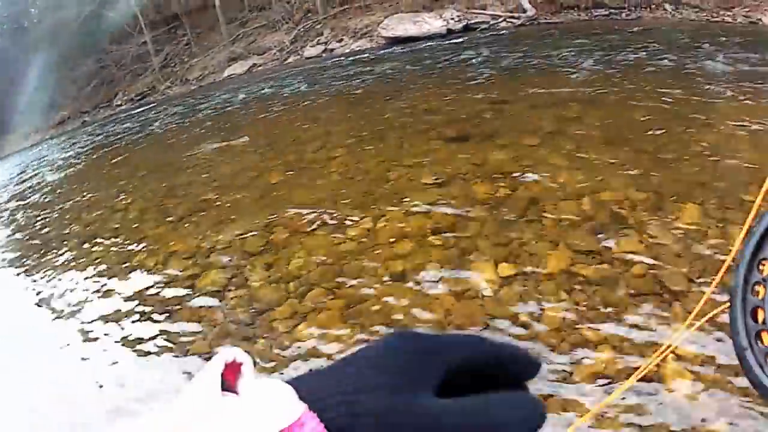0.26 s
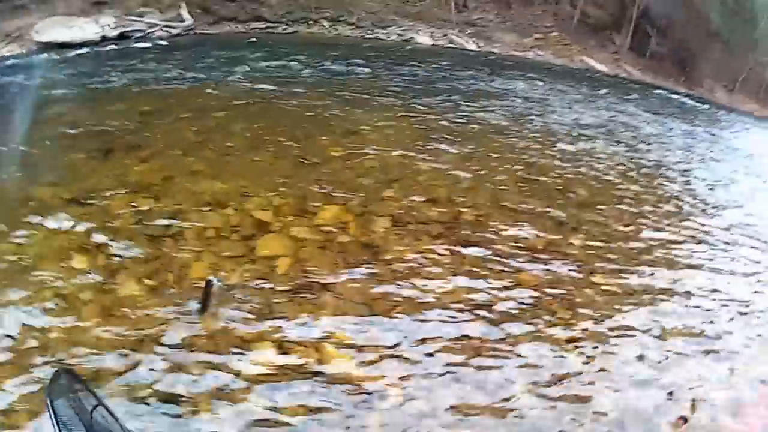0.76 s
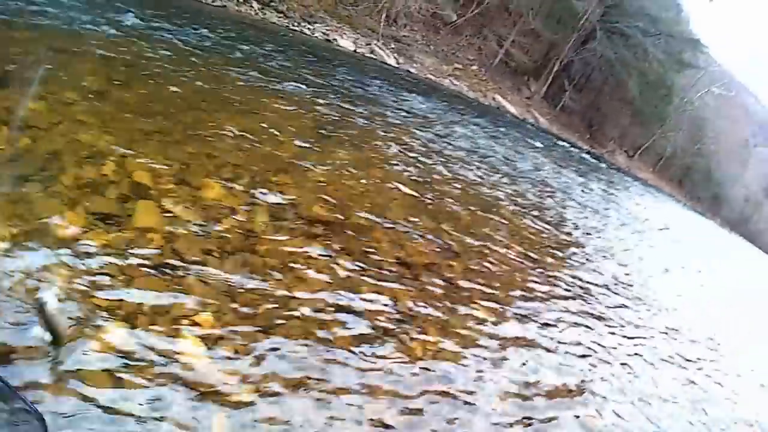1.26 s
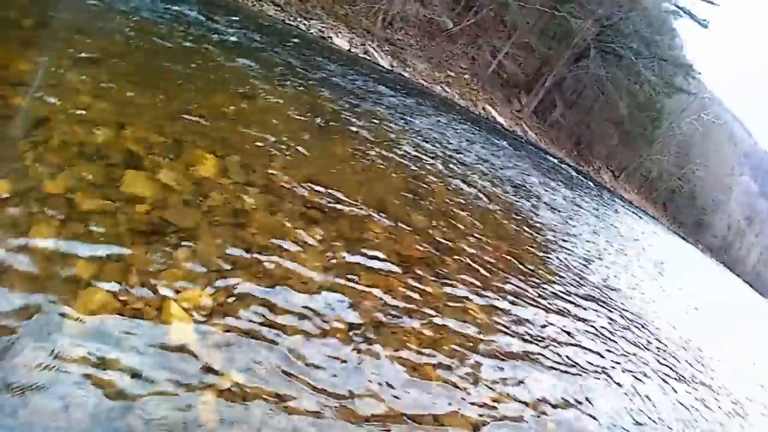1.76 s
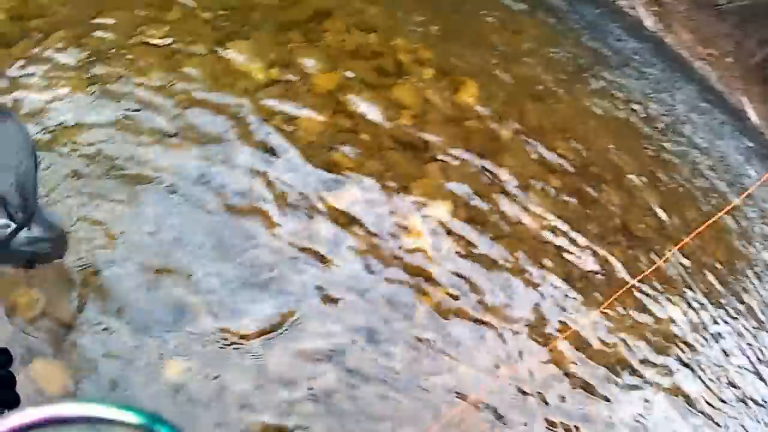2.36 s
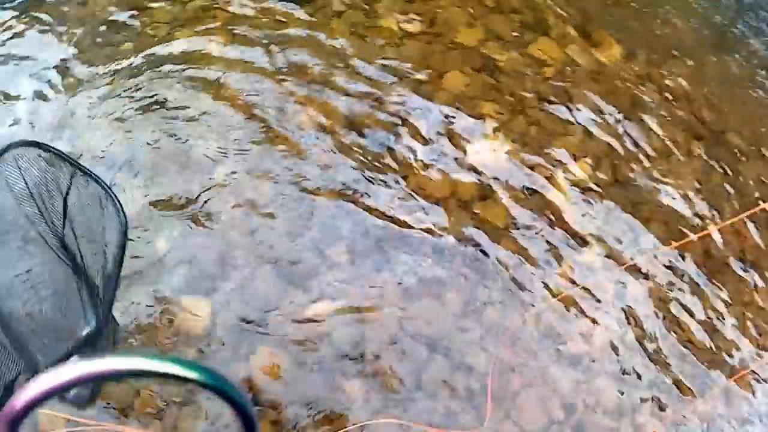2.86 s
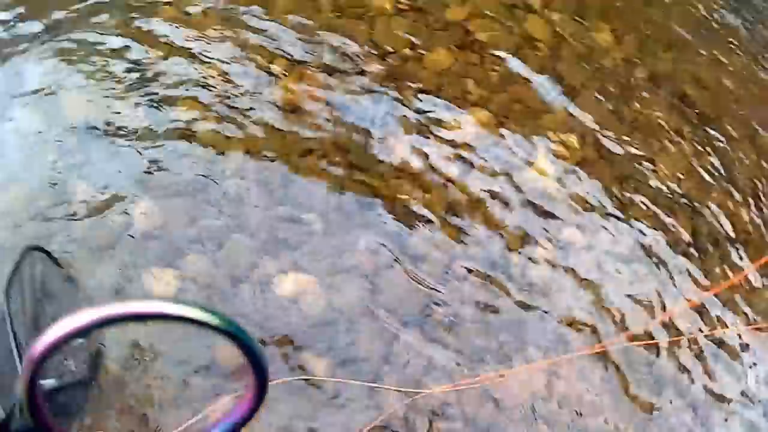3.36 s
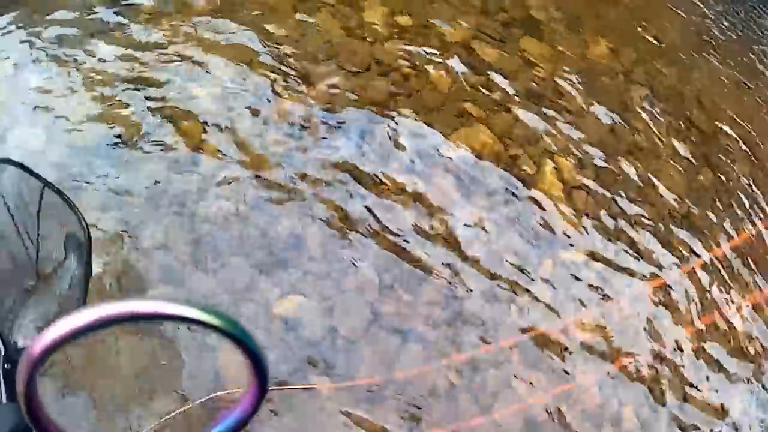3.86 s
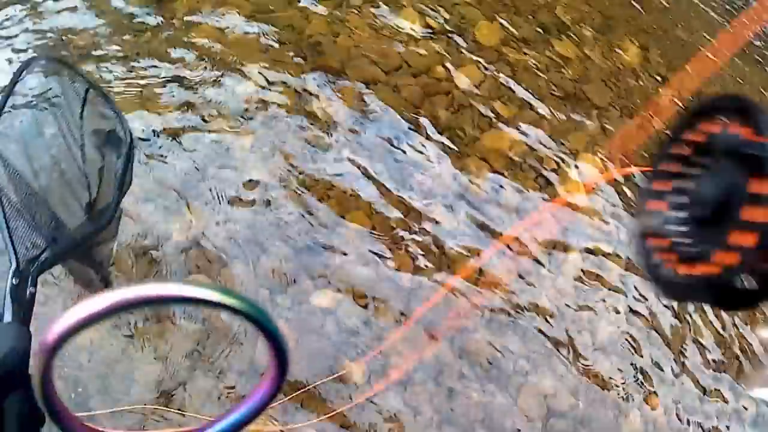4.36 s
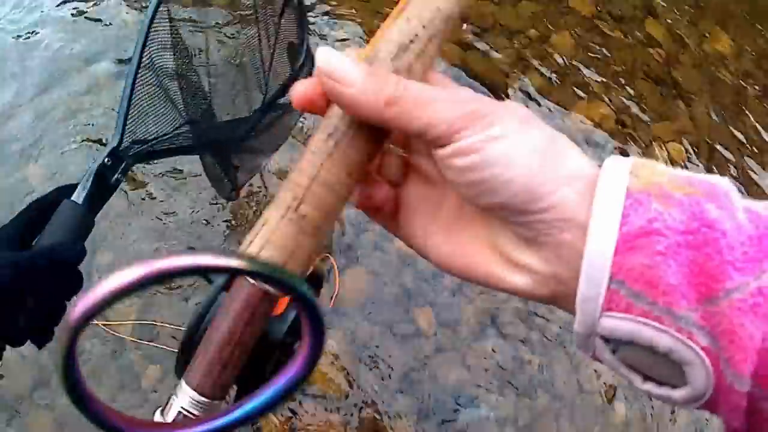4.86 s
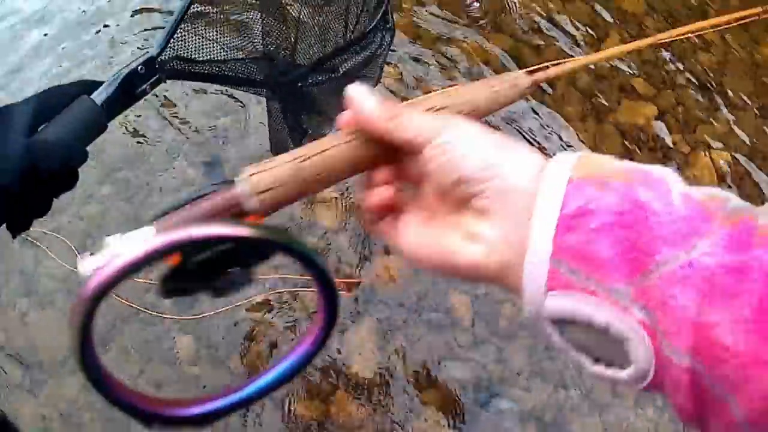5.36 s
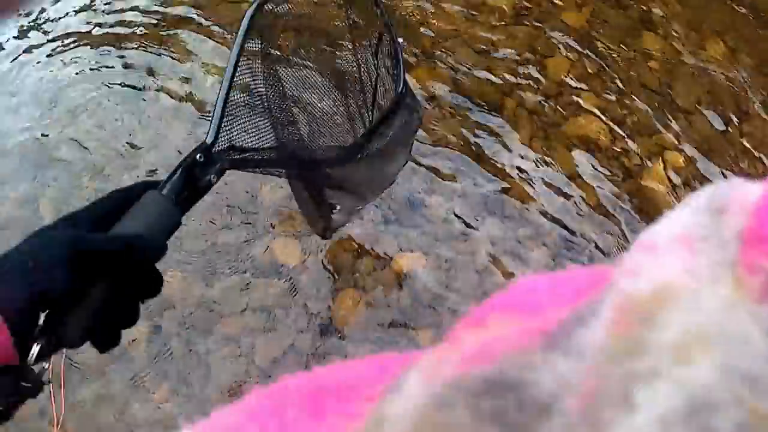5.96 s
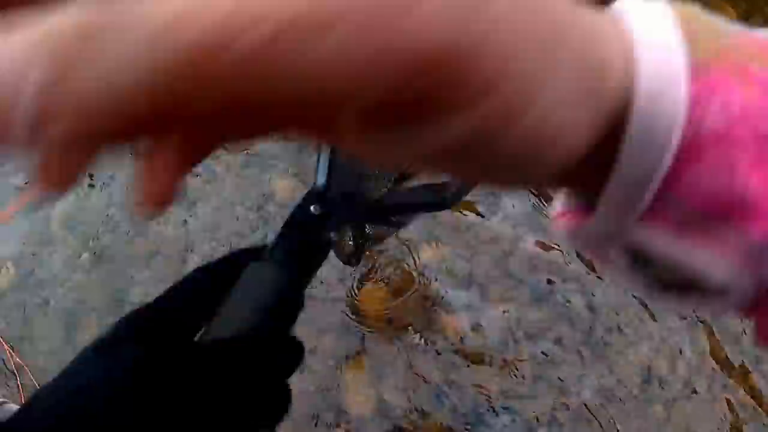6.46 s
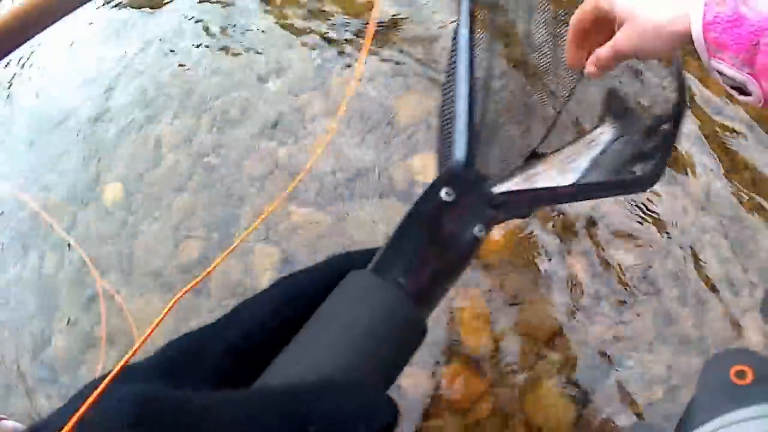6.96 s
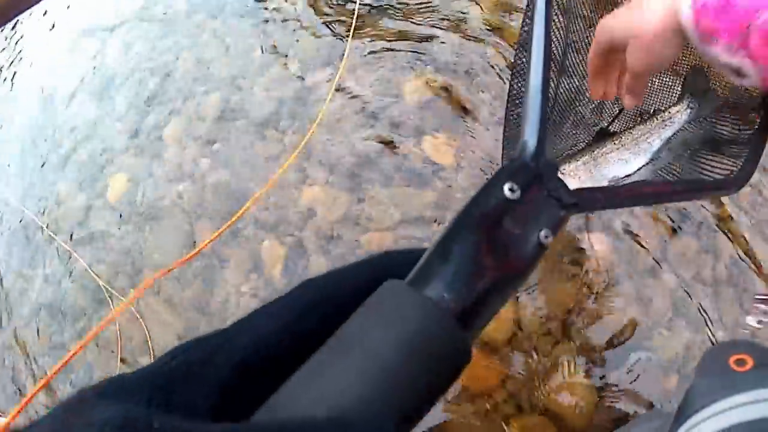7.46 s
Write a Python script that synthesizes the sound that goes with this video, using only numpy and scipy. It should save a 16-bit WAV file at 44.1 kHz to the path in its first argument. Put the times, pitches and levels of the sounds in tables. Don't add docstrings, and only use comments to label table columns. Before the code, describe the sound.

A cheap, muffled, low-bandwidth microphone sealed in a case on an angler's chest picks up mostly contact noise, with a shallow stream only a faint dull murmur. Near silence opens, with tiny taps around 0.4-0.6 s. From 0.7 to 1.25 s fleece sweeps across, with a firm push, strap taps and a low bump. Between 1.9 and 4.5 s there are sparse soft brushes and small hollow ticks between quiet rests. Clicks and knocks return at 4.6-5.3 s; rubbing and swaying thicken from 5.4, with a sharp knock at 5.72. A rattling cluster of strikes and scrapes hits at 6.12, then hard hollow blows from 6.4, peaking at 6.54 with a short boom. Scuffs and taps continue to 6.8. After a lull, quick ticks lead to a bright hard clack at 7.09, smaller taps at 7.16 and 7.25, then faint murmur.

```python
import sys
import numpy as np
from scipy import signal
from scipy.fft import rfft, irfft, next_fast_len
from scipy.io import wavfile
from scipy.ndimage import uniform_filter1d, map_coordinates

SR = 44100
rng = np.random.default_rng(int(sys.argv[2]) if len(sys.argv) > 2 else 0)


def amplitude_ratio(level_db):
    exponent = np.asarray(level_db, float) / 20
    return 10 ** exponent


def store_wav(level_fs):
    pcm = np.round(np.clip(np.atleast_2d(level_fs), -1, 1) * 32767)
    wavfile.write(sys.argv[1], SR, pcm.T.astype(np.int16))


N = 339570

# (frequency [Hz], level [dB per Hz])
CASE_SPECTRUM = [(180, -39.5), (300, -11), (331, -17.5), (520, -12), (901, -10.5), (1130, -1), (1250, -12),
                 (1530, -2), (1820, -4.5), (2250, -12), (2750, -27), (3150, -14.5), (3500, -17),
                 (3950, -57), (5140, -73.5), (8690, -120)]
# (frequency [Hz], level [dB per Hz])
SWAY_SPECTRUM = [(7.1, -41), (12, 3.5), (31, -0.5), (206, -20), (300, -27), (390, -53), (660, -120)]
# (frequency [Hz], level [dB per Hz])
DRAG_SPECTRUM = [(60, -14), (150, -1.5), (350, -4.5), (600, -8.5), (900, -11.5), (2000, -19.5)]
# (frequency [Hz], level [dB per Hz])
STREAM_SPECTRUM = [(59, -29), (100, 0.5), (161, -3), (203, -5), (273, -18), (304, -1), (365, -13),
                   (1510, -17), (3530, -24.5), (3990, -29), (5190, -44), (8780, -120)]
# (frequency [Hz], step [dB])
CAMERA_STEP = [(100, -28), (800, -22), (1600, -18), (2300, -9), (3200, -4.5), (3700, -3), (4000, .5)]

# (start [s], length [s], level [dB], fibre pitch [Hz])
RESTS = [
    (0, 0.031, -74, 1430),
    (0.555, 0.92, -71, 1400),
    (1.563, 0.33, -72, 1400),
    (2.706, 0.25, -70, 1510),
    (3.408, 0.67, -74.5, 1500),
    (4.216, 0.53, -72.5, 1558),
    (4.803, 0.43, -73.5, 1430),
    (6.958, 0.34, -70.5, 1400),
    (7.263, 0.11, -74.5, 1400),
    (7.398, 0.36, -80.5, 1367),
]
# (start [s], length [s], level [dB], fibre pitch [Hz])
STROKES = [(0.739, 0.29, -62.5, 1330), (0.925, 0.076, -53.5, 1486), (1.096, 0.11, -55, 1490),
           (2.055, 0.36, -66, 1400), (2.42, 0.16, -70.5, 1400), (2.37, .12, -67, 1450),
           (.66, .04, -67, 1500), (1.41, .04, -71, 1400), (5.95, .04, -53, 1520), (2.531, 0.037, -64, 1190),
           (2.573, 0.026, -63, 1670), (2.744, 0.025, -65, 1370), (2.791, 0.041, -66, 1620),
           (3.024, 0.028, -68, 1830), (3.149, 0.017, -58.5, 1630), (3.248, 0.082, -64.5, 1560),
           (3.594, 0.13, -74.5, 1470), (4.592, 0.15, -64.5, 1550), (4.99, 0.049, -69.5, 1430),
           (5.307, 0.055, -68, 1540), (5.597, 0.21, -59.5, 1640), (5.961, 0.31, -49, 1476),
           (6.138, 0.031, -43.5, 1355), (6.285, 0.18, -54, 1400), (6.433, 0.094, -42.5, 1290),
           (6.513, 0.14, -49, 1315), (6.599, 0.032, -47, 1546), (6.731, 0.043, -57.5, 1490),
           (6.85, 0.076, -65, 1380), (7.105, 0.052, -57, 1508)]
# (start [s], length [s], level [dB], fibre pitch [Hz])
GRABS = [
    (.425, 0.08, -68, 1440),
    (1.96, 0.037, -72, 1352),
    (5.431, 0.65, -57, 1596),
]
# (time [s], width [s], reduction [dB])
LIFTS = [(.82, .07, 4), (1.29, .09, 4), (2.655, .07, 8), (3.22, .05, 5), (3.37, .04, 6), (3.625, .05, 7),
         (4.42, .05, 3), (6.415, .018, 7), (6.82, .05, 4), (7.13, .035, 8), (7.195, .02, 7)]
# (start [s], length [s], level [dB])
LEANS = [(.7, 0.13, -63.5), (.96, 0.033, -58), (1.14, 0.075, -50.5), (1.52, 0.26, -66), (2.12, 0.34, -67.5),
         (2.5, 0.99, -63), (3.19, 0.092, -54.5), (3.6, 0.43, -65), (4.4, 0.33, -61), (4.7, 0.27, -57),
         (5, 0.27, -70), (5.47, 0.082, -50), (5.62, 0.36, -53), (6.11, 0.15, -45.5), (6.56, 0.029, -47),
         (6.65, 0.15, -53), (6.88, 0.44, -58)]

# (time [s], peak [dB], frequency [Hz], length [ms])
WALL_RINGS = [(.4235, -64.5, 3300, 1.5), (3.547, -61, 1970, 6), (3.807, -58.5, 3400, 1.5),
              (3.844, -61, 3500, 1.5), (3.975, -51, 1300, 5), (4.328, -54, 1490, 5),
              (4.466, -56, 3540, 1.5), (4.617, -57, 3480, 1.5), (5.01, -45.5, 1600, 7),
              (6.5372, -15.5, 3640, 2), (7.0872, -21.5, 3520, 2.5), (.998, -46, 1490, 9.2),
              (1.21, -43.5, 1620, 10), (2.015, -53, 1400, 14), (3.657, -51.5, 1416, 8.6),
              (4.617, -39, 1590, 6.2), (5.278, -40.5, 1680, 5.8), (6.091, -35, 1700, 10),
              (6.106, -36, 1650, 5.4), (6.165, -34, 1690, 6.4), (6.176, -33.5, 1470, 6),
              (6.503, -27.5, 2050, 3.7), (6.1198, -29, 1940, 3.5), (6.123, -29, 3000, 7.3),
              (6.1237, -23, 1260, 6.5), (6.13, -19.5, 1200, 2.9), (6.1337, -18.5, 1220, 4.6),
              (6.4974, -17.5, 1560, 5.8), (6.5372, -8.5, 1192, 4.5), (6.538, -19, 2970, 6.2),
              (6.54, -15.5, 1576, 5.9), (6.601, -31.5, 1500, 11), (6.631, -34, 1500, 10),
              (6.643, -34, 1495, 11), (6.658, -38, 1550, 9), (6.695, -30, 1350, 5.1), (6.7, -31, 1660, 7),
              (6.7525, -36.5, 1573, 6.6), (7.055, -33.5, 1240, 4.5), (7.067, -33.5, 1300, 4.4),
              (7.075, -28.5, 1290, 5.2), (7.0797, -28, 1250, 4.2), (7.087, -11.5, 1430, 4.8),
              (7.0873, -16, 1910, 4.3), (7.0873, -27.5, 2900, 4.6), (7.163, -33, 1500, 4.7),
              (7.167, -32.5, 1430, 6)]
# (time [s], peak [dB], frequency [Hz], length [ms])
FURTHER_RINGS = [(6.4975, -36, 3200, 5), (6.484, -46, 3250, 6), (3.0385, -54, 3200, 4), (5.718, -40, 3200, 4.5),
                 (5.731, -47, 3200, 4), (6.158, -44, 3000, 8), (7.034, -60, 3100, 24), (7.078, -42, 2800, 4),
                 (7.162, -44, 2800, 4), (7.167, -37, 1800, 7), (7.0868, -23, 3800, 3), (5.709, -38, 1600, 6),
                 (3.395, -56, 2000, 9), (3.657, -58, 2000, 9), (5.848, -49, 1950, 8), (5.857, -48, 2000, 7),
                 (5.888, -48, 1600, 8), (5.903, -47, 1550, 7), (5.942, -44, 1550, 8), (5.954, -43, 1500, 8),
                 (5.97, -43, 1550, 8), (6.325, -50, 3200, 24), (6.35, -49, 3250, 24), (6.372, -50, 3200, 24),
                 (5.635, -46, 1650, 8), (5.647, -45, 1800, 8), (5.655, -46, 1600, 8), (6.538, -27, 620, 10),
                 (6.684, -37, 1250, 8), (6.708, -36, 1700, 8), (6.59, -34, 1500, 7), (7.231, -50, 1300, 10),
                 (7.215, -62, 3000, 24), (6.785, -56, 3200, 16), (6.508, -30, 1550, 7), (6.617, -34, 1550, 7)]
# (time [s], peak [dB], ring [Hz])
SLEEVE_KNOCKS = [(.426, -56, 1450), (.526, -53, 1540), (0.549, -56, 1500), (0.73, -48, 1600),
                 (0.907, -48, 1220), (2.332, -46, 1180), (3.076, -53, 1870), (3.154, -45, 1690),
                 (3.408, -56.5, 1310), (3.602, -49.5, 1470), (4.329, -51, 1530), (4.465, -45.5, 1590),
                 (4.552, -55, 1450), (5.244, -48.5, 1500), (5.438, -42.5, 1430), (5.519, -49, 1600)]
# (time [s], peak [dB], ring [Hz], contact [ms])
STRAP_TAPS = [(.757, -45, 1220, 4.4), (1.047, -45, 1690, 2.8), (1.117, -41, 1440, 7),
              (1.175, -32, 1400, 12), (1.2, -38, 1510, 5.2), (3.809, -56, 1580, 3), (1.873, -50, 1140, 9.6),
              (2.011, -48, 1290, 4.2), (2.824, -46, 1880, 10), (3.04, -46, 1810, 6), (3.333, -45, 1520, 11),
              (3.547, -59, 1980, 4.4), (5.008, -39.5, 1510, 3.8), (5.317, -43.5, 1530, 1.8),
              (5.364, -46, 1540, 2.3), (5.611, -41.5, 1600, 3.1), (5.733, -38, 1460, 4),
              (5.841, -44, 1760, 6.8), (6.753, -38, 1650, 4.2), (6.771, -37.5, 1700, 6),
              (7.04, -45, 1400, 7), (7.056, -39, 1230, 11), (7.248, -39, 1430, 8)]
# (time [s], peak [dB], ring [Hz], body [dB], snap [dB])
GEAR_BLOWS = [(6.398, -31, 1090, 1, -20), (.622, -51, 1400, 0, -25), (3.399, -56, 1880, -7, -14),
              (3.965, -43.5, 1460, -9, -5), (4.618, -41, 1600, -38, -20), (4.653, -41, 1910, -10, -2.5),
              (5.279, -43.5, 1650, -44, -43), (5.541, -38.5, 1460, 3, -3), (5.709, -40, 1600, -16, -15),
              (5.718, -22, 1640, -12.5, -7), (6.122, -24, 1530, -26, -2), (6.4258, -30, 1250, -6, -8),
              (6.4437, -33, 1258, -8, -20), (6.47, -35, 1164, -3, -25), (6.503, -23, 1520, -26, -28),
              (6.507, -27, 1650, -14, -19.5), (6.5376, -15, 1320, -9.5, -2.5), (6.908, -46, 1590, -19, 1.5),
              (7.069, -33, 1896, -26, -15.5), (7.075, -26.5, 1400, -35, -21.5),
              (7.082, -32, 1144, -38, -3.5), (7.0872, -18.5, 1470, -49, 4.5), (7.162, -32, 1827, -30.5, 0),
              (7.229, -43, 1750, -28, -6.5)]
# (time [s], peak [dB], ring [Hz], snap [dB], contact [ms])
SCRAPES = [(6.539, -20.5, 1900, -21.5, 6), (7.088, -25, 1917, -6, 3.7), (.996, -42.5, 1520, -48, 6.1),
           (3.281, -46, 1470, -31, 42), (6.035, -36.5, 1690, -22, 6.4), (6.1205, -20, 1670, -3, 15.6),
           (6.131, -21, 1500, -7.5, 6.4), (6.592, -28.5, 1800, -5, 33), (7.06, -34.5, 1326, -10, 34),
           (7.146, -46, 1770, -5, 14), (7.16, -28, 1700, -7, 11.5), (6.4905, -29, 1510, -18, 8.9),
           (6.5295, -21, 1353, -13.5, 6.3)]
# (time [s], peak [dB], ring [Hz], snap [dB], contact [ms])
SHOVES = [
    (.944, -33, 1450, -24.5, 14),
    (3.659, -49, 1470, -40, 9.8),
    (4.723, -52, 1550, -27, 12),
    (5.939, -64, 1680, -12, 14),
    (6.175, -32.5, 1470, -48, 17),
    (6.635, -37, 1502, -26, 13),
    (6.7, -29.5, 1750, -9.5, 11),
    (6.694, -31, 1500, -14.5, 13),
]
# (time [s], level [dB], frequency [Hz], t60 [ms], overtone [dB])
WALL_STRIKES = [(6.4256, -17.5, 1200, 25, -17), (6.4436, -21.5, 1200, 25, -22),
                (6.4705, -24.5, 1170, 20, -24), (3.0388, -43, 1900, 14, -14), (5.7312, -36, 1800, 10, -9),
                (6.1206, -26, 1450, 16, -4), (6.1317, -22, 1300, 12, -8), (7.0805, -30, 1350, 12, -8),
                (7.0415, -45, 1350, 20, -14), (.6225, -48, 1300, 12, -20), (6.597, -40, 1900, 10, -6),
                (6.6955, -34, 1300, 14, -10), (6.7059, -36, 1800, 10, -6), (5.8412, -47, 2050, 16, -24),
                (3.409, -62, 1400, 6, 2), (3.582, -59, 2000, 16, -20), (3.602, -55, 1500, 16, -12),
                (1.0485, -45, 1500, 12, -18), (5.4385, -43, 1550, 20, -14), (5.448, -46, 1550, 16, -16),
                (5.5195, -46, 1600, 16, -20), (.4265, -58, 1500, 16, -8)]
# (time [s], peak [dB], width [ms], direction [signed gain])
JOLTS = [(.98, -34, 6.8, 0.83), (1.152, -35, 5.7, 1), (1.19, -34.5, 6.2, 0.9), (1.224, -35, 8, -0.81),
         (4.642, -40, 7.3, -1.1), (4.703, -36, 15, 1), (4.719, -41, 11, -1.1), (5.478, -26, 18, 0.64),
         (5.495, -28, 28, -1.15), (5.519, -29, 6.3, 1), (6.008, -32.5, 77, -0.59), (6.173, -36, 18, -1.2),
         (6.212, -29.5, 32, -0.5), (6.535, -19.5, 3.7, 0.36), (6.547, -11.5, 11, -0.36),
         (6.589, -23.5, 7.8, 0.91), (6.64, -39, 72, -1.1), (6.71, -23, 6.5, 0.97),
         (6.727, -34.5, 32, -1.25)]
# (time [s], level [dB], frequency [Hz], t60 [s])
THUDS = [
    (.546, -49.5, 250, 0.046),
    (2.1, -54, 440, .03),
    (4.326, -52, 290, 0.022),
    (4.551, -44.5, 340, 0.027),
    (6.526, -22, 110, 0.033),
    (6.537, -15, 147, 0.05),
    (6.425, -28, 160, .03),
    (6.492, -27, 210, 0.045),
    (1.196, -26.5, 110, 0.032),
]
# (time [s], step [dB])
SLIPS = [
    (5.543, -36),
    (5.5767, -31),
    (6.75, -31),
]

STROKE_RISE_DB_S, STROKE_FALL_DB_S, GRAB_RISE_DB_S = 202, 107.5, 2000
STILL_DB, STILL_HZ = -82, 1400
LEAN_RISE_DB_S, LEAN_FALL_DB_S, STAND_DB = 84.5, 80, -66.5
DRAG_BY_LEAN, DRAG_BY_RUB, DRAG_DB = 0.46, 0.41, -10
HOLLOW_HZ, HOLLOW_WIDTH_HZ, HOLLOW_SHARE = 584, 130, 0.11
PADDED_BODY_DB, PADDED_SNAP_DB, PADDED_MS = -7, -17.5, 7.2
TAP_BODY_DB, TAP_SNAP_DB, BLOW_MS = -17.5, -31, 6.2
SCRAPE_BODY_DB, SHOVE_BODY_DB = -21, -7
RING_LEAN, KNOCK_RISE_MS, HARD_ABOVE_DB = .75, .4, -24
DENT_SHARE, DENT_MS = 1.6, .45
INSIDE_HZ, INSIDE_DB, INSIDE_BY_DULL = 610, -22, .6
CAMERA_HZ, HOP, START = 8000, 128, 280
SPARE_ABOVE_DB, SPARE_SHARE = -38.5, 0.51


def unit(x):
    return x / np.sqrt(np.mean(x ** 2) + 1e-20)


def along(points, hz):
    f, v = np.transpose(points)
    return np.interp(np.log(hz + 1), np.log(f + 1), v)


def wobble(rate_hz):
    return map_coordinates(rng.standard_normal(int(N * rate_hz / SR) + 4), [np.arange(N) * rate_hz / SR])


def coloured(x, spectrum):
    m = next_fast_len(N + 8192)
    gain = amplitude_ratio(along(spectrum, np.fft.rfftfreq(m, 1 / SR)))
    return unit(irfft(rfft(x, m) * gain, m)[:N])


def ring(x, hz, width_hz):
    return signal.lfilter(*signal.iirpeak(hz, hz / width_hz, SR), x)


def add_at(out, s, sound):
    out[round(s * SR):][:len(sound)] += sound


def bell(t, centre_s, width_s):
    return np.exp(-np.log(16) * ((t - centre_s) / width_s) ** 2)


def curves(rows, rise_db_s, fall_db_s):
    s, long_s, db = np.transpose(rows)[:3, :, None]
    t = np.arange(0, N, 32) / SR
    below_db = np.clip(s - t, 0, None) * rise_db_s + np.clip(t - s - long_s, 0, None) * fall_db_s
    return amplitude_ratio(2 * (db - below_db))


def fine(v):
    return np.interp(np.arange(N), 32 * np.arange(len(v)), v)


def gestures():
    swept = RESTS + STROKES
    rubs = np.vstack([curves(swept, STROKE_RISE_DB_S, STROKE_FALL_DB_S),
                      curves(GRABS, GRAB_RISE_DB_S, STROKE_FALL_DB_S)])
    still = amplitude_ratio(2 * STILL_DB)
    total = rubs.sum(axis=0) + still
    pitch_hz = (np.transpose(swept + GRABS)[3] @ rubs + STILL_HZ * still) / total
    t = np.arange(0, N, 32) / SR
    lift_db = sum(db * bell(t, s, width_s) for s, width_s, db in LIFTS)
    rub_db = 10 * np.log10(total) - lift_db
    lean = curves(LEANS, LEAN_RISE_DB_S, LEAN_FALL_DB_S).sum(axis=0)
    sway_db = 10 * np.log10(lean + amplitude_ratio(2 * STAND_DB))
    drag_db = DRAG_DB + DRAG_BY_LEAN * sway_db + DRAG_BY_RUB * rub_db
    return map(fine, (rub_db, pitch_hz, sway_db, drag_db))


def fibres(pitch_hz):
    spread, size_draw = rng.standard_normal((2, 5000))
    at = (np.sort(rng.random(5000)) * N).astype(int)
    hz = pitch_hz[at, None] * np.exp(.11 * spread[:, None])
    t = np.arange(300) / SR
    size = amplitude_ratio(6.5 * np.clip(size_draw, -3, 1.25) + 3.0 * wobble(30)[at])[:, None]
    grain = size * np.sin(2 * np.pi * hz * t) * hz * t * np.exp(-hz * t / 2.2)
    return unit(np.bincount((at[:, None] + np.arange(300)).ravel(), grain.ravel())[:N])


def movement():
    rub_db, pitch_hz, sway_db, drag_db = gestures()
    hiss = coloured(rng.standard_normal(N) * amplitude_ratio(2.4 * wobble(40)), CASE_SPECTRUM)
    hollow = unit(ring(ring(hiss, HOLLOW_HZ, HOLLOW_WIDTH_HZ), HOLLOW_HZ, 2 * HOLLOW_WIDTH_HZ))
    texture = 0.66 * hiss + 0.52 * fibres(pitch_hz) + HOLLOW_SHARE * hollow
    rub = amplitude_ratio(rub_db + 4.0 + 1.8 * wobble(19)) * texture
    rumble = amplitude_ratio(2.2 * wobble(12)) * coloured(rng.standard_normal(N), SWAY_SPECTRUM)
    sway = amplitude_ratio(sway_db + 5.5) * unit(rumble)
    scuff = amplitude_ratio(1.6 * wobble(24)) * coloured(rng.standard_normal(N), DRAG_SPECTRUM)
    drag = amplitude_ratio(drag_db + 2.5) * unit(scuff)
    return rub + sway + drag


def stream():
    return amplitude_ratio(-76.5 + 2.3 * wobble(2.7)) * coloured(rng.standard_normal(N), STREAM_SPECTRUM)


def rings():
    out, t = np.zeros(N + SR), np.arange(SR // 40) / SR
    for s, db, hz, long_ms in WALL_RINGS + FURTHER_RINGS:
        swell = np.sin(np.pi * np.clip(1000 * t / long_ms, 0, 1) ** RING_LEAN) ** 2
        add_at(out, s, amplitude_ratio(db) * swell * np.sin(2 * np.pi * hz * t))
    return out[:N]


def contact(blow, db, hz, body_db, snap_db):
    wall = ring(ring(blow, hz, 380), hz, 900)
    wall = wall + 0.37 * ring(ring(blow, 1180, 350), 1180, 600)
    wall = wall + 0.17 * ring(ring(blow, 1950, 450), 1950, 800)
    wall = ring(wall, 1700, 1900)
    body = ring(ring(blow, 540, 290), 580, 510)
    snap = ring(ring(blow, 3400, 1700), 3400, 1800) + 0.9 * ring(blow, 2930, 220)
    parts = [(wall, 0), (body, body_db), (snap, snap_db)]
    return sum(amplitude_ratio(db + rel_db - 0.54) * v / abs(v).max() for v, rel_db in parts)


def knocks():
    out, ms = np.zeros(N + SR), 1000 * np.arange(SR // 12) / SR
    sharp = [(*row, PADDED_BODY_DB, PADDED_SNAP_DB, PADDED_MS) for row in SLEEVE_KNOCKS]
    sharp += [(*row, BLOW_MS) for row in GEAR_BLOWS]
    sharp += [(s, db, hz, TAP_BODY_DB, TAP_SNAP_DB, long_ms) for s, db, hz, long_ms in STRAP_TAPS]
    sliding = [(s, db, hz, SCRAPE_BODY_DB, *rest) for s, db, hz, *rest in SCRAPES]
    sliding += [(s, db, hz, SHOVE_BODY_DB, *rest) for s, db, hz, *rest in SHOVES]
    for s, db, *ringing, long_ms in sharp:
        rattle = np.exp(-(ms / max(long_ms, .7)) ** 1.6) * (1 - np.exp(-ms / KNOCK_RISE_MS))
        blow = rng.standard_normal(len(ms)) * rattle
        lead, push = (0, 3.2) if db > HARD_ABOVE_DB else (12, 2.2)
        blow[lead:lead + 7] -= push
        add_at(out, s, contact(blow, db, *ringing))
    for s, *ringing, long_ms in sliding:
        swell = np.exp(-(ms / long_ms) ** 3) * (1 - 0.32 * np.exp(-ms / (0.34 * long_ms)))
        add_at(out, s, contact(rng.standard_normal(len(ms)) * swell, *ringing))
    return out[:N]


def strikes():
    out, t = np.zeros(N + SR), np.arange(SR // 20) / SR
    for s, db, hz, t60_ms, over_db in WALL_STRIKES:
        decay_db = -60000 * t / t60_ms
        wall = np.sin(2 * np.pi * hz * t) * (amplitude_ratio(decay_db) + DENT_SHARE * np.exp(-1000 * t / DENT_MS))
        over = sum(np.sin(2 * np.pi * min(hz * k, 3800) * t) * amplitude_ratio(over_db + decay_db * k / 1.5)
                   for k in (1.68, 2.7))
        inside = np.sin(2 * np.pi * INSIDE_HZ * t) * amplitude_ratio(INSIDE_DB - INSIDE_BY_DULL * over_db + decay_db)
        add_at(out, s, -amplitude_ratio(db) * (wall + over + inside))
    return out[:N]


def bumps():
    out, t = np.zeros(N + SR), np.arange(SR // 5) / SR
    half_s = t[-1] / 2
    for s, db, width_ms, way in JOLTS:
        add_at(out, s - half_s, way * amplitude_ratio(db) * bell(t, half_s, width_ms / 1000))
    for s, db, hz, t60_s in THUDS:
        add_at(out, s, amplitude_ratio(db - 60 * t / t60_s) * np.sin(2 * np.pi * hz * t))
    for s, db in SLIPS:
        add_at(out, s, -amplitude_ratio(db) * np.exp(-t / 0.0064))
    return out[:N]


def scene():
    return (movement() + stream() + rings() + knocks() + strikes() + bumps())[None]


def camera_rounding(x):
    k, n = np.arange(HOP) + .5, np.arange(2 * HOP) + .5
    window = np.sin(np.pi * n / (2 * HOP))
    basis = window * np.cos(np.pi / HOP * np.outer(k, n + HOP / 2)) * np.sqrt(2 / HOP)
    front, count = 8 * HOP - START, 8 * (len(x) // (8 * HOP) + 2)
    rows = np.arange(count)[:, None] * HOP + np.arange(2 * HOP)
    c = np.pad(x, (front, (count + 1) * HOP - front - len(x)))[rows] @ basis.T
    power = (c ** 2).reshape(-1, 8, HOP).mean(axis=1)
    local_db = 10 * np.log10(uniform_filter1d(power, size=12, axis=1) + 1e-18)
    bass = power[:, :20].mean(axis=1, keepdims=True)
    treble = power[:, 20:].mean(axis=1, keepdims=True)
    whole_db = 10 * np.log10(treble + 0.0047 * bass)
    step_db = .45 * local_db + .58 * whole_db + along(CAMERA_STEP, k * CAMERA_HZ / (2 * HOP))
    step_db = step_db - SPARE_SHARE * np.clip(whole_db - SPARE_ABOVE_DB, 0, None)
    step = np.repeat(amplitude_ratio(step_db), 8, axis=0)
    uneven = amplitude_ratio(2 * rng.standard_normal((count // 4, 16)))
    step *= np.repeat(uneven, 4, axis=0).repeat(8, axis=1)
    band = ((c / step) ** 2).reshape(count, 16, 8).mean(axis=2)
    faint = band.repeat(8, axis=1) < .2
    c = ~faint * np.sign(c) * np.floor(abs(c) / step + .4) * step
    return np.bincount(rows.ravel(), (c @ basis).ravel())[front:][:len(x)]


def low_pass(x):
    return signal.sosfilt(signal.butter(12, 15900, fs=SR, output="sos"), x)


def record(dry):
    slow = camera_rounding(signal.resample(dry[0], N * CAMERA_HZ // SR))
    joined = np.interp(np.arange(N) / SR, np.arange(len(slow)) / CAMERA_HZ, slow)
    mix = joined + amplitude_ratio(-97.5) * rng.standard_normal(N)
    return low_pass(mix[None])


dry = scene()
out = record(dry)
store_wav(out)
```